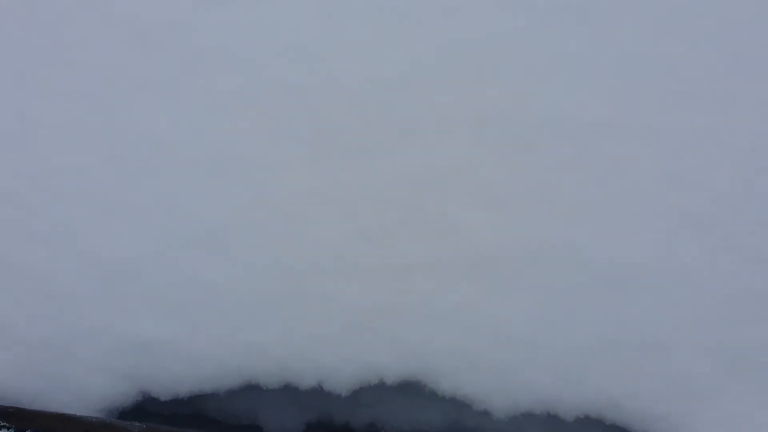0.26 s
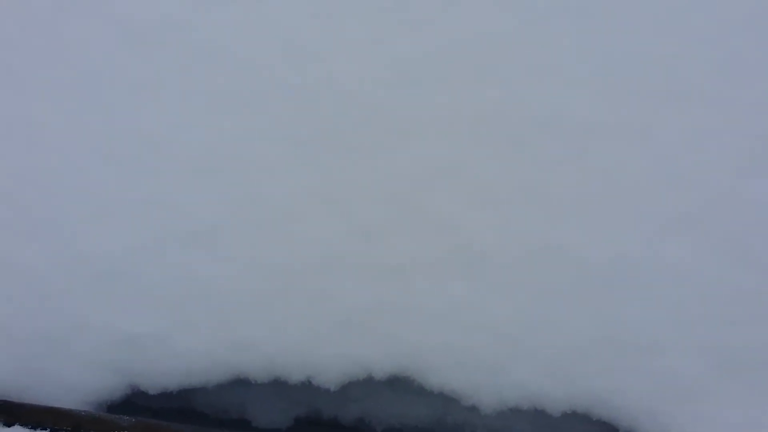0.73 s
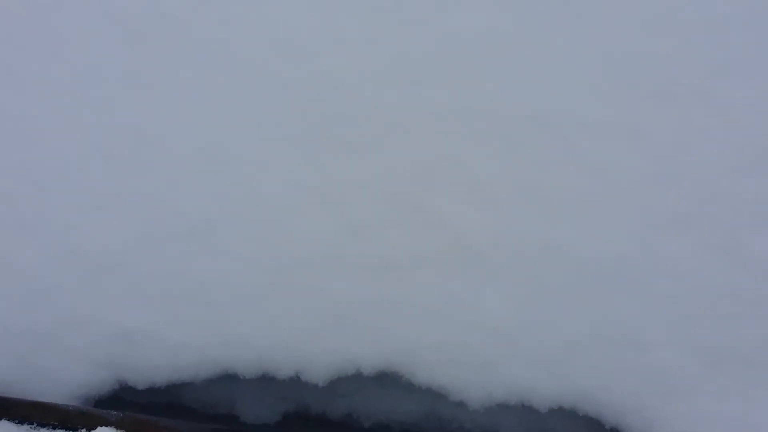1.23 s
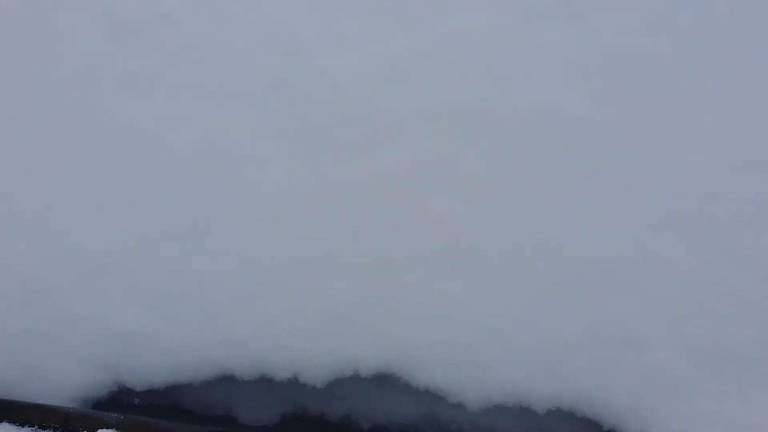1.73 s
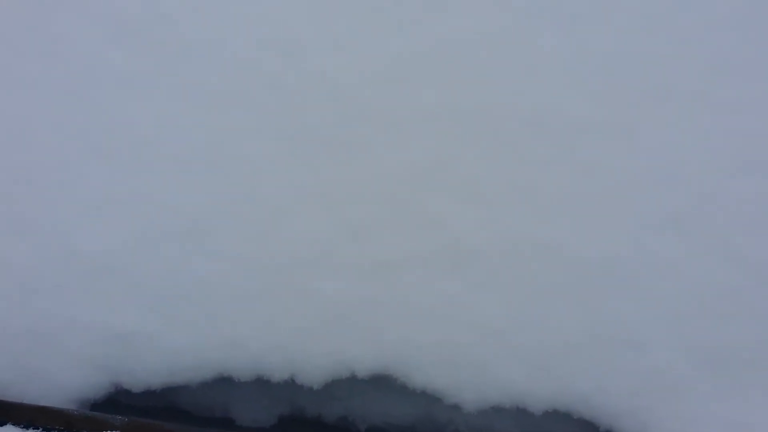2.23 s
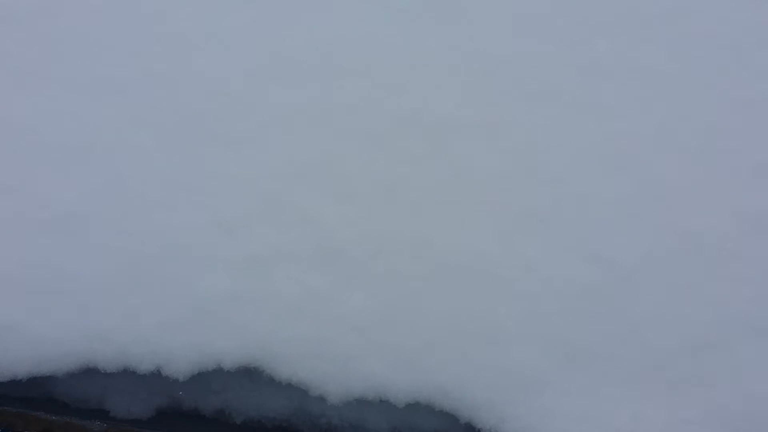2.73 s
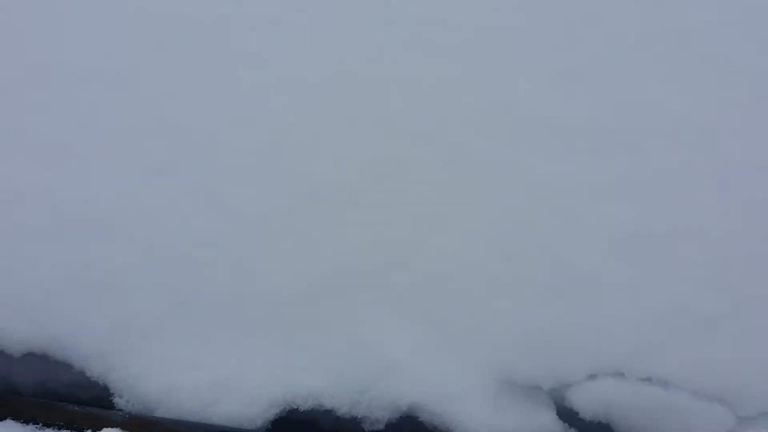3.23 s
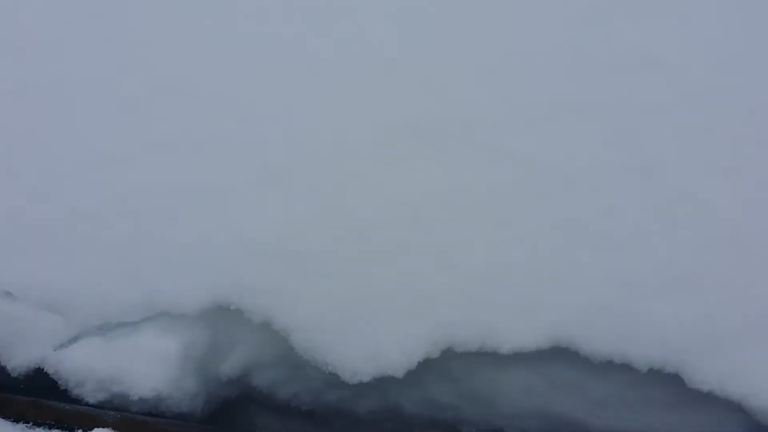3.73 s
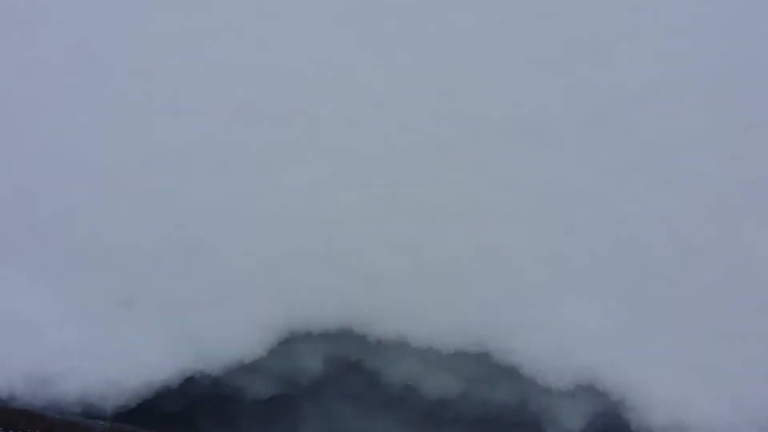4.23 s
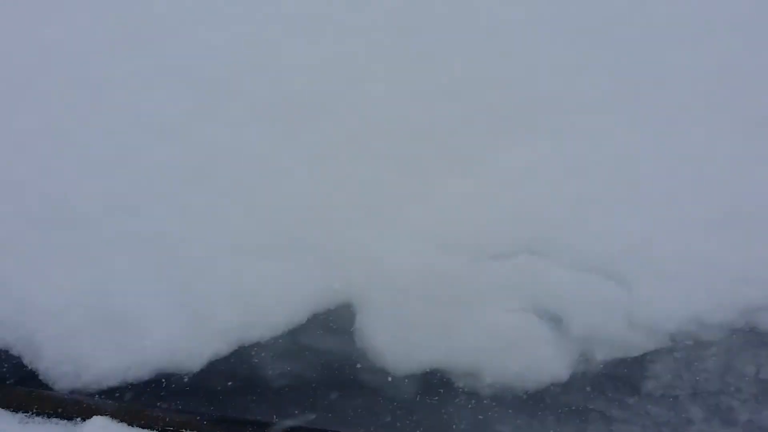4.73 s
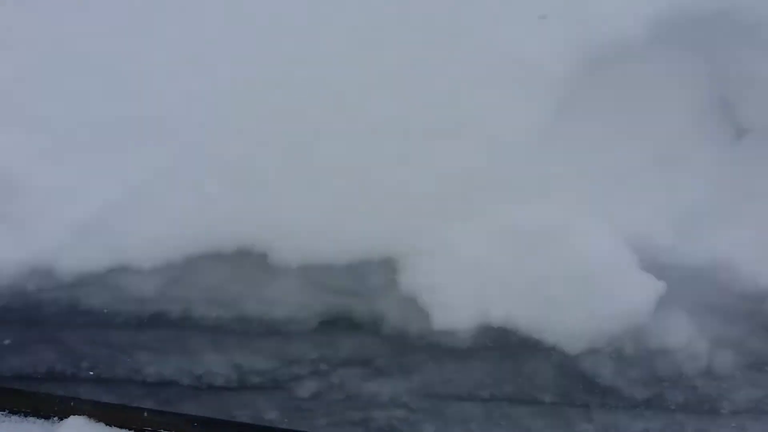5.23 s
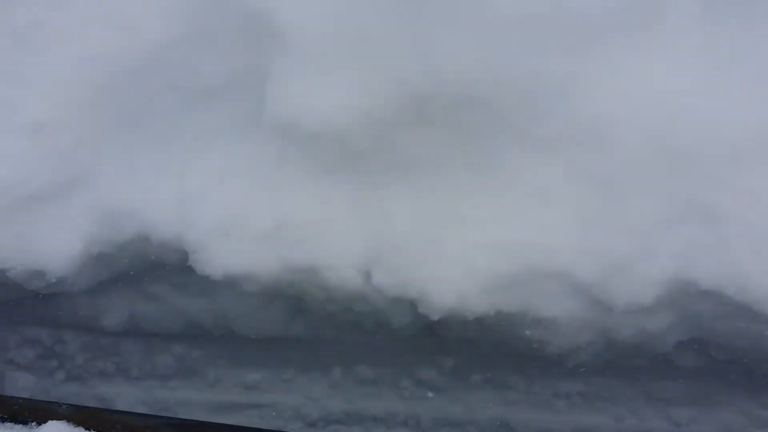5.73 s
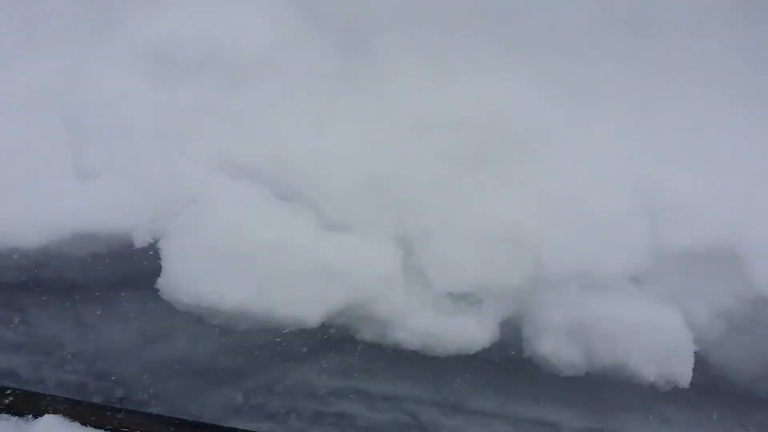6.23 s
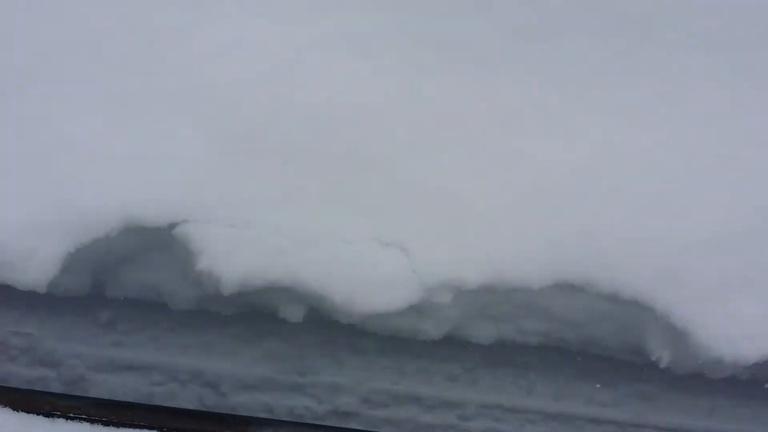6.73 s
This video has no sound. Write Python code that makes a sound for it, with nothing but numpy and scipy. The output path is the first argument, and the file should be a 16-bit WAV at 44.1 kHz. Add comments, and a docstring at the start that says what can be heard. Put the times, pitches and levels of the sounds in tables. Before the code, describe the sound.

A small stereo microphone in a car cabin picks up a muffled V8 at low revs, dull thumps and faint ticks. Midway comes a much louder roar, climbing in pitch, with clustered panel knocks about twenty a second and bright buzzing trim on the right. It drops away to a bright key clink, a cloth swish on the left, a renewed low drone and hollow snow scraping.

```python
"""First a V8 is heard droning at low revs inside a car cabin, over body boom and road rush: harmonics of the
firing rate, and filtered noise. The wheels spin up: revs climb, the drivetrain roars and judders about twenty
times a second, shaking trim near the right microphone port (noise bursts through resonances).
Hanging keys clink (decaying modes), loose trim ticks, the floor thumps, snow drags and slides, and cloth
brushes once."""
import sys
import numpy as np
from scipy import signal
from scipy.fft import rfft, irfft, next_fast_len
from scipy.io import wavfile
from scipy.ndimage import uniform_filter1d

SR = 44100
rng = np.random.default_rng(int(sys.argv[2]) if len(sys.argv) > 2 else 0)


def gain_from_decibels(decibels):
    """Convert decibel values to linear amplitude factors."""
    exponent = np.asarray(decibels, float) / 20
    return 10 ** exponent


def dump_mix(stems):
    """Bounce the given channels to the path in sys.argv[1] as a 16-bit WAV at rate SR."""
    frames = np.atleast_2d(stems).T  # one column per channel
    limited = np.clip(frames, -1, 1)  # hard clip at full scale
    pcm = np.round(limited * 32767).astype(np.int16)
    wavfile.write(sys.argv[1], SR, pcm)


N = 307818
SIZE = next_fast_len(N)
HZ = np.maximum(np.fft.rfftfreq(SIZE, 1 / SR), 1)


def on_hz(points):
    """Spectral envelope: a table over f/Hz read at every bin, linear in log frequency."""
    hz, value = np.transpose(points)
    return np.interp(np.log(HZ), np.log(hz), value)


def curve(rows, column, outside=None):
    """Temporal envelope: one column of a table over t/s read at every sample."""
    rows = np.array(rows)
    return np.interp(np.arange(N) / SR, rows[:, 0], rows[:, column], outside, outside)


def peaks(table):
    """Superposition of resonances: complex gain of damped modes given as (f/Hz, width/Hz, level/dB)."""
    return sum(gain_from_decibels(db) * 1j * HZ * width / (hz * hz - HZ ** 2 + 1j * HZ * width) for hz, width, db in table)


def walk(rate):
    """Slow random modulation: levels held 1 / rate s and smoothed twice; spread near 1."""
    hold = int(SR / rate)
    steps = np.repeat(rng.standard_normal(N // hold + 1), hold)
    return 1.15 * uniform_filter1d(uniform_filter1d(steps, hold), hold)[:N]


# Coherence of the two ports: f/Hz, share of power common to both
COHERENCE = [(30, .8), (60, .88), (150, .88), (370, .92), (620, .78), (870, .45), (1250, .75), (2100, .75),
             (3500, .45), (5000, .15), (15000, .05)]
# Diffraction round the casing: f/Hz, phase the left port regains/rad
PHASE_LEAD = [(60, 0), (300, .3), (600, .35), (1200, 1.1), (1500, 1.0), (2100, .3), (2900, -.5), (5000, 0)]


def ports(common, own, balance, lead=PHASE_LEAD, gain=1):
    """Partial coherence: a common part, delayed at the left port, plus a part of each port's own."""
    lag = 24  # samples
    share = np.clip(on_hz(COHERENCE), 0, 1)
    left_path = np.exp(1j * (on_hz(lead) - 2 * np.pi * HZ * lag / SR))
    paths = np.array([left_path, np.ones(len(HZ))])
    half = on_hz(balance) / 2
    both = np.sqrt(share) * paths * rfft(common, SIZE) + np.sqrt(1 - share) * rfft(own, SIZE)
    return irfft(gain * gain_from_decibels(np.array([half, -half])) * both, SIZE)[:, :N]


def noise(gain, balance, envelope=1, lead=PHASE_LEAD):
    """Filtered random excitation: gated noise through a gain normalised to unit rms before the port balance."""
    chance = envelope * rng.standard_normal((3, N))
    unit_gain = gain / np.sqrt(np.mean(np.abs(gain) ** 2))
    return ports(chance[0], chance[1:], balance, lead, unit_gain)


def bursts(times, dbs, rise_s, fall_s):
    """Impulsive excitation: a short swell and an exponential decay from each time."""
    out = np.zeros(N)
    for s, db, fall in np.broadcast(times, dbs, fall_s):
        start = int(s * SR)
        t = np.arange(min(int(.15 * SR), N - start)) / SR
        out[start:][:len(t)] += gain_from_decibels(db) * (1 - np.exp(-t / rise_s)) * np.exp(-t / fall)
    return out


# Engine speed: t/s, firing rate f/Hz
FIRING_RATE = [(0.0, 64), (0.45, 63.5), (0.7, 69.5), (1.5, 70), (1.88, 58), (2.68, 69.4), (2.77, 88),
               (2.89, 112), (2.99, 128), (3.15, 141), (3.45, 149), (3.75, 153), (4.0, 161), (4.3, 175),
               (4.45, 180), (4.66, 186), (4.78, 173), (4.9, 143), (5.1, 133.5), (5.5, 66), (5.62, 70),
               (5.81, 76), (6.2, 76.5), (6.65, 74.6), (6.98, 72.5)]
# Firing tone, fading while the throttle is closed: t/s, level/dB
ENGINE_LEVEL = [(0.0, -40), (0.45, -36), (0.7, -33.5), (1.5, -32.5), (1.88, -40.5), (2.3, -36), (2.68, -34),
                (2.77, -19.5), (2.89, -24), (2.99, -32), (3.6, -32.5), (4.1, -27), (4.3, -22.5),
                (4.78, -21), (4.9, -33), (5.2, -37), (5.46, -34), (5.56, -33), (5.81, -25), (6.65, -30),
                (6.98, -37.5)]
# Engine orders: multiple of the firing rate, level/dB
ENGINE_ORDERS = [(1, -1), (1.25, -14), (2, -8), (3.25, -14)]
# Cabin standing waves sharing the tone unevenly: f/Hz, left minus right level/dB
STANDING_WAVES = [(58, -1), (68, -3), (76, 2.5), (100, -4), (150, -0.5), (250, -12)]


def engine():
    """Periodic excitation: orders of the firing rate swell and sag; the bulkhead acts as a low-pass."""
    rate = curve(FIRING_RATE, 1) * (1 + 0.0042 * walk(20))
    phase = 2 * np.pi * np.cumsum(rate) / SR
    tone = sum(gain_from_decibels(db + 1.15 * k * walk(8)) * np.sin(k * phase + k) for k, db in ENGINE_ORDERS)
    tone = np.sqrt(2) * tone * gain_from_decibels(curve(ENGINE_LEVEL, 1))
    bulkhead = 1 / (1 + (HZ / 330) ** 6)
    return ports(tone, tone, STANDING_WAVES, gain=bulkhead)


# Drivetrain jolts: t/s, panel knock level/dB, upper against lower panel level/dB, trim rattle level/dB
JOLT_TABLE = [(2.768, -34, -6, -35), (2.866, -11, -14, -16), (2.907, -10, -14, -23),
              (2.947, -9, -10.5, -17.5), (2.987, -10.5, -6, -21), (3.032, -7.5, -6, -18),
              (3.083, -10.5, -13.5, -21), (3.12, -11, -4, -22), (3.151, -9, -4, -29), (3.202, -9, -8, -21),
              (3.252, -8, -8, -22.5), (3.287, -12.5, -11, -22), (3.332, -13.5, -6, -22),
              (3.382, -10, -5, -22), (3.427, -10.5, -6, -24), (3.858, -11, -9.5, -26),
              (3.91, -10, -8.5, -23), (3.956, -11.5, -6, -20.5), (4.261, -9.5, -5, -22),
              (4.326, -9, -4.5, -16.5), (4.361, -12.5, -6, -31), (4.406, -11, -10, -19.5),
              (4.448, -11, -16, -27), (4.488, -9, -12.5, -16.5), (4.545, -9.5, -8, -19.5),
              (4.615, -13.5, -6, -23), (4.697, -11.5, -12, -20.5), (4.776, -10, -1.5, -18.5),
              (4.844, -11, -15, -17)]
# Modes of the lower panel: f/Hz, width/Hz, level/dB
LOWER_MODES = [(560, 130, -6), (800, 200, -7), (1147, 177, -3.5), (2230, 870, -13.5)]
# Modes of the upper panel: f/Hz, width/Hz, level/dB
UPPER_MODES = [(1540, 107, 0), (2240, 170, -20)]
# Phase for the knocked lower panel: f/Hz, phase the left port regains/rad
LOWER_LEAD = [(60, 0), (730, .6), (1000, 3.0), (1300, 3.5), (1500, 1.2), (2100, .4), (3400, -.5)]
# Spectrum of a dull thud: f/Hz, density level/dB
THUD_SPECTRUM = [(110, -20), (170, 0), (330, 0), (600, -5), (1100, -12), (1650, -15), (2500, -20),
                 (4000, -40)]
# Port balance for things near the right port: f/Hz, left minus right level/dB
NEAR_BALANCE = [(200, -4), (870, -3), (1230, 3), (1750, 1), (2050, -6), (2900, -4), (4900, -8), (6000, -3),
                (7200, -6), (8000, -14), (15000, -18)]
# Port balance for the cabin at large: f/Hz, left minus right level/dB
WIDE_BALANCE = [(40, -1.5), (130, -3.5), (200, -3.5), (370, -2.5), (730, -4), (1100, -1.5), (1500, 3),
                (1750, 1), (2050, -3.5), (2900, -2), (4200, -4), (6000, 2), (7200, 3), (8000, -9),
                (15000, -12)]


def panel_knocks():
    """Impact excitation of modes: each jolt knocks two panels, the upper a moment later, and thuds the shell."""
    s, db, upper_db, _ = np.transpose(JOLT_TABLE)
    dull = 1 / (1 + (HZ / 3000) ** 2)  # padded contact
    # each jolt shares its force out afresh among the lower modes
    shares = 1.6 * rng.standard_normal((len(LOWER_MODES), len(s)))  # dB
    lower = 0
    for (hz, width, mode_db), share_db in zip(LOWER_MODES, shares):
        hits = bursts(s, db - upper_db / 2 + share_db, 0.0021, 0.0064)
        lower = lower + gain_from_decibels(mode_db) * noise(peaks([(hz, width, 0)]) * dull, NEAR_BALANCE, hits, LOWER_LEAD)
    upper_hits = bursts(s + 0.0062, db + upper_db / 2, 0.0011, 0.011)
    upper = noise(peaks(UPPER_MODES) * dull, NEAR_BALANCE, upper_hits)
    body = noise(gain_from_decibels(on_hz(THUD_SPECTRUM)), WIDE_BALANCE, bursts(s, db, 0.0044, 0.012))
    return lower + upper + gain_from_decibels(-6) * body


# Trim rattle spectrum: f/Hz, density level/dB
RATTLE_SPECTRUM = [(1470, -9), (2500, -12), (3500, -14), (4200, 0), (6500, 7), (7700, 4), (8400, 9),
                   (9300, 1), (10800, -4.5), (12000, -13), (15300, -30)]
# Trim sizzle while the body shakes: t/s, level/dB
SIZZLE_LEVEL = [(2.62, -56), (2.7, -47), (2.8, -40.5), (2.87, -36), (3.6, -39.5), (4.41, -35.5),
                (4.63, -37.5), (4.82, -44), (5.14, -53), (6.98, -52)]
# Sizzle spectrum: f/Hz, density level/dB
SIZZLE_SPECTRUM = [(1470, -7), (2300, 6.5), (2700, 0), (3200, 0.5), (3880, -3), (6500, -1), (8500, -4),
                   (11400, -10), (14100, -9), (14700, -25), (15300, -30)]
# Port balance for the trim beside the right port: f/Hz, left minus right level/dB
BESIDE_BALANCE = [(2500, -5), (5000, -8), (6000, -3), (7300, -6), (7900, -21), (10000, -22), (12000, -18)]


def trim_rattle():
    """Repeated contact: jolts rattle the trim through many small uneven impacts; it sizzles in between."""
    s, _, _, rattle_db = np.transpose(JOLT_TABLE)
    early_s = 0.0018  # the trim starts just before the lower panel
    grit = gain_from_decibels(2.2 * walk(300))  # many small contacts, uneven in size
    hits = bursts(s - early_s, rattle_db, 0.0046, 0.0057)
    rattle = noise(gain_from_decibels(on_hz(RATTLE_SPECTRUM)), BESIDE_BALANCE, grit * hits)
    shaking = gain_from_decibels(curve(SIZZLE_LEVEL, 1, -88) + 1.2 * walk(45))
    return rattle + noise(gain_from_decibels(on_hz(SIZZLE_SPECTRUM)), BESIDE_BALANCE, grit * shaking)


# Tremor spectrum: f/Hz, density level/dB
TREMOR_SPECTRUM = [(4000, -26.5), (6500, -19), (8500, -1), (10500, -5.5), (13500, -1.5), (14700, -11),
                   (15300, -33)]


def tremor():
    """Engine-locked vibration: trim shakes once an engine cycle, with a thin tick ahead of each shake."""
    from_s, count, cylinders, jitter_s = 3.4515, 26, 8, 0.001
    tremor_db, scatter_db, pretick_db, pretick_cycles = -32, 1.5, -42, 0.34
    chance, size = rng.standard_normal((2, count))
    cycles = np.cumsum(curve(FIRING_RATE, 1)) / SR / cylinders
    beats = cycles[int(from_s * SR)] + np.arange(count)
    beat_s = np.searchsorted(cycles, beats) / SR + jitter_s * chance
    tick_s = np.searchsorted(cycles, beats - pretick_cycles) / SR + jitter_s * chance
    shakes = bursts(beat_s, tremor_db + scatter_db * size, 0.00095, 0.0052)
    ticks = bursts(tick_s, pretick_db + 3 * chance, 0.001, 0.002)
    shake = noise(gain_from_decibels(on_hz(TREMOR_SPECTRUM)), BESIDE_BALANCE, shakes)
    return shake + noise(peaks([(8460, 900, 0)]) ** 2, BESIDE_BALANCE, ticks)


# Cabin noise: t/s, body boom level/dB, road and gear rush level/dB
CABIN_LEVELS = [(0.2, -31, -42.5), (1.07, -26, -40), (1.55, -27.5, -41), (2.05, -33.5, -45),
                (2.4, -30, -38.5), (2.68, -29.5, -37.5), (2.88, -14, -27), (3.4, -16, -27),
                (3.7, -17.5, -26), (4.15, -15.5, -24.5), (4.42, -15, -22.5), (4.81, -16, -22.5),
                (5.05, -19, -31), (5.2, -25.5, -36), (5.36, -31, -34.5), (5.52, -26.5, -34),
                (6.2, -22.5, -32), (6.7, -27, -30.5), (6.98, -25, -29.5)]
# Boom spectrum at low revs: f/Hz, density level/dB
BOOM_SPECTRUM = [(18, -41), (30, -34), (52, -8.5), (72, -9), (105, -2.5), (146, 1), (194, -2), (269, -1),
                 (439, -14), (600, -17), (780, -28), (1320, -120)]
# Boom spectrum under load: f/Hz, density level/dB
ROAR_SPECTRUM = [(18, -67), (30, -18), (51, -16), (75, -2), (114, -3.5), (145, 0.5), (178, -1.5), (225, -2),
                 (289, -1.5), (372, -3.5), (436, -11), (700, -11.5), (910, -51), (1540, -120)]
# Growl of a floor panel: t/s, level against the boom/dB, centre f/Hz
GROWL_TRACK = [(2.8, -37, 300), (3.1, -14, 300), (3.5, -5, 298), (3.9, -8.5, 288), (4.2, -15, 275),
               (4.45, -11, 272), (5.12, -5, 285), (5.22, -27, 281)]


def body_boom():
    """Structure-borne noise: the shell's boom crossfades to a roar and a growling panel as revs rise."""
    load = np.clip((curve(FIRING_RATE, 1) - 78) / 25, 0, 1)
    idle = noise(gain_from_decibels(on_hz(BOOM_SPECTRUM)), WIDE_BALANCE)
    roar = noise(gain_from_decibels(on_hz(ROAR_SPECTRUM)), WIDE_BALANCE)
    swing = 2 * np.pi * np.cumsum(curve(GROWL_TRACK, 2)) / SR
    growl = walk(60) * np.sin(swing) + walk(60) * np.cos(swing)  # narrow-band noise round a moving centre
    growl = gain_from_decibels(curve(GROWL_TRACK, 1)) * ports(growl, growl, WIDE_BALANCE)
    shell = np.sqrt(1 - load) * idle + np.sqrt(load) * (roar + growl)
    return shell * gain_from_decibels(curve(CABIN_LEVELS, 1) + 1.16 * walk(13))


# Rush spectrum: f/Hz, density level/dB
RUSH_SPECTRUM = [(300, -5), (420, 2), (760, 1.5), (950, 0.5), (1350, -0.5), (1750, -10), (2300, -14),
                 (2700, -15), (3200, -21), (4500, -27.5), (6500, -44)]
# Whirr resonances: f/Hz, width/Hz, level/dB
WHIRR_MODES = [(1498, 96, 0), (1642, 210, -2.3)]


def road_rush():
    """Broadband rolling noise: road and gears rush, with a narrow-band whirr of gears or a blower."""
    rush = noise(gain_from_decibels(on_hz(RUSH_SPECTRUM)), WIDE_BALANCE) * gain_from_decibels(0.91 * walk(14) + 1.26 * walk(90))
    whirr = noise(peaks(WHIRR_MODES) ** 2, WIDE_BALANCE) * gain_from_decibels(-9.5 + 1.6 * walk(20))
    return (rush + whirr) * gain_from_decibels(curve(CABIN_LEVELS, 2))


# Packed snow dragging under the floor: t/s, level/dB
DRAG_LEVEL = [(4.9, -27), (5.15, -38.5), (5.75, -36.5), (5.87, -29), (6.2, -24.5), (6.33, -36.5),
              (6.47, -23), (6.58, -37), (6.98, -31)]
# Dragging snow spectrum: f/Hz, density level/dB
DRAG_SPECTRUM = [(220, -30), (330, -4), (480, 0), (620, -3), (720, -1), (900, -7), (1200, -14), (2200, -34),
                 (4000, -70)]


def snow_drag():
    """Friction noise: packed snow drags under the floor, with a hollow note from a narrow resonance."""
    level = curve(DRAG_LEVEL, 1, -90)
    scrape = noise(gain_from_decibels(on_hz(DRAG_SPECTRUM)), WIDE_BALANCE, gain_from_decibels(level + 1.6 * walk(12)))
    note = noise(peaks([(730, 61, 0)]) ** 2, WIDE_BALANCE, gain_from_decibels(level + 4.2 * walk(25)))
    return scrape + gain_from_decibels(-7.5) * note


# Loose trim: t/s, scrape level/dB, thud level/dB, scrape decay time/s, left minus right level/dB
TRIM_TICKS = [(0.065, -37, -18.5, 0.013, 2.5), (0.52, -36.5, -35, 0.0055, 3),
              (1.126, -26.5, -21.5, 0.013, 1), (1.409, -42, -31, 0.011, 2), (2.846, -29, -33, 0.004, -10),
              (4.238, -29, -45, 0.003, 0.1), (6.926, -32, -42, 0.0049, -11)]
# Scrape spectrum: f/Hz, density level/dB
TICK_SPECTRUM = [(500, -13), (1500, -22), (2620, 7), (3090, -10), (4090, -0.5), (7570, 1), (8100, -1.5),
                 (15000, -21)]
# Faint trim squeaks: t/s, level/dB
SQUEAK_TABLE = [(1.925, -43), (1.962, -45)]


def trim_ticks():
    """Stick and slip: short crackly scrapes, each from its own side, with dull thuds and two faint squeaks."""
    s, db, thud_db, decay_s, pan_db = np.transpose(TRIM_TICKS)
    side = np.interp(np.arange(N) / SR, s, pan_db) / 2
    crackle = bursts(s, db, 0.0032, np.clip(decay_s, .001, .05)) * gain_from_decibels(1.6 * walk(460))
    scrape = noise(gain_from_decibels(on_hz(TICK_SPECTRUM)), WIDE_BALANCE, crackle) * gain_from_decibels(np.array([side, -side]))
    thud = noise(gain_from_decibels(on_hz(THUD_SPECTRUM)), WIDE_BALANCE, bursts(s + 0.0054, thud_db, 0.0018, 0.014))
    squeak_s, squeak_db = np.transpose(SQUEAK_TABLE)
    squeaks = bursts(squeak_s, squeak_db, 0.004, 0.01)
    return scrape + thud + noise(peaks([(2900, 350, 0)]) ** 2, WIDE_BALANCE, squeaks)


# Floor thumps: t/s, level/dB, f/Hz
BUMP_TABLE = [(0.086, -18.5, 170), (1.893, -22.5, 106), (6.849, -15.5, 133)]


def bumps():
    """Damped oscillation: each low thump is one dull, quickly decaying swing of the floor."""
    fall_s = 0.005
    out, t = np.zeros(N + SR), np.arange(SR // 10) / SR
    swell = t / fall_s * np.exp(1 - t / fall_s)
    for s, db, hz in BUMP_TABLE:
        out[int(s * SR):][:len(t)] += gain_from_decibels(db) * np.sin(2 * np.pi * hz * t) * swell
    return ports(out[:N], out[:N], WIDE_BALANCE)


# Key clinks: t/s, level/dB, brightness/(dB per octave)
CLINK_TABLE = [(0.218, -44, 9), (3.859, -36, 16), (5.058, -24, 8), (5.1492, -37, 18), (5.577, -34.5, 2),
               (5.664, -40, 5), (5.717, -41, 8)]
# Modes of the keys: f/Hz, level/dB, 60 dB decay time/s
KEY_MODES = [(6190, -7, 0.23), (7600, -16, 0.12), (9001, -5, 0.097), (11930, -15, 0.096),
             (13200, -14, .025)]


def keys():
    """Modal ringing: small steel keys collide, each strike sharing its force out afresh among the modes."""
    out, t = np.zeros(N + SR), np.arange(SR // 3) / SR
    onset = 1 - np.exp(-t / 0.00046)
    shares = rng.standard_normal((len(CLINK_TABLE), len(KEY_MODES)))  # dB
    for (s, db, tilt_db), strike_shares in zip(CLINK_TABLE, shares):
        for (hz, mode_db, t60), share_db in zip(KEY_MODES, strike_shares):
            ring = np.sin(2 * np.pi * hz * t) * np.exp(-np.log(1000) * t / t60) * onset
            level_db = db + mode_db + tilt_db * np.log2(hz / 9000) + share_db
            out[int(s * SR):][:len(t)] += gain_from_decibels(level_db) * ring
    s, db, _ = np.transpose(CLINK_TABLE)
    contact = noise(peaks([(11000, 7000, 0)]) ** 2, NEAR_BALANCE, bursts(s, db - 12, 0.0004, 0.002))
    return ports(out[:N], out[:N], NEAR_BALANCE) + contact


# Cloth brushing: t/s, level/dB
BRUSH_LEVEL = [(5.26, -81), (5.296, -43.5), (5.332, -38.5), (5.42, -59)]
# Cloth spectrum: f/Hz, density level/dB
CLOTH_SPECTRUM = [(880, 1), (1500, -7), (2000, -15), (2360, -2.5), (2880, -10), (3270, -6), (10000, -28),
                  (14000, -53)]


def cloth():
    """Friction noise: one soft swish of cloth on the left."""
    left = [(100, 9.9), (15000, 34)]  # f/Hz, left minus right level/dB
    return noise(gain_from_decibels(on_hz(CLOTH_SPECTRUM)), left) * gain_from_decibels(curve(BRUSH_LEVEL, 1, -77))


# Late swells of snow sliding over the glass: t/s, level/dB
SLIDE_LEVEL = [(6.25, -65), (6.4, -42), (6.55, -62), (6.8, -39), (6.98, -72)]


def snow_slide():
    """Resonant friction noise: snow slides over the glass, hissing near 1.55 and 3.1 kHz."""
    swell = gain_from_decibels(curve(SLIDE_LEVEL, 1, -90) + 1.7 * walk(13))
    return noise(peaks([(3100, 210, 3), (1550, 230, 8.4)]), WIDE_BALANCE, swell)


# Air hiss spectrum: f/Hz, density level/dB
AIR_SPECTRUM = [(1760, -0.5), (3000, -2), (3280, -8.5), (4510, -8.5), (4860, -9.5), (6980, -4.5),
                (13500, -16.5), (14700, -35), (15300, -43)]


def air_hiss():
    """Stationary broadband noise: a thin air hiss that wavers slightly in level."""
    return noise(gain_from_decibels(on_hz(AIR_SPECTRUM)), WIDE_BALANCE) * gain_from_decibels(-51 + 0.8 * walk(6.2))


def scene():
    """Linear superposition of all sources at the two ports."""
    judder = panel_knocks() + trim_rattle() + tremor()
    cabin = body_boom() + road_rush() + snow_drag() + snow_slide() + air_hiss()
    return engine() + judder + cabin + trim_ticks() + bumps() + keys() + cloth()


def band_limit(x):
    """A steep low-pass at the top of the band."""
    return signal.sosfilt(signal.butter(12, 15410, fs=SR, output="sos"), x)


def record(dry):
    """Band limiting and saturation: deep bass is lost, the loudest peaks are rounded and the top is cut."""
    bass = signal.butter(4, 46, "high", fs=SR, output="sos")  # the small microphone loses the deepest bass
    top = signal.ellip(10, .2, 70, 14750, fs=SR, output="sos")
    rounded = np.tanh(0.84 * signal.sosfilt(bass, dry)) / 0.93
    mix = signal.sosfilt(top, rounded)
    return band_limit(mix)


dry = scene()
out = record(dry)
dump_mix(out)
```